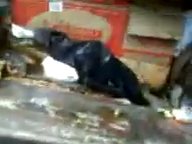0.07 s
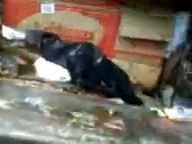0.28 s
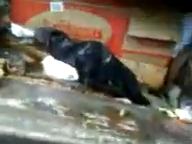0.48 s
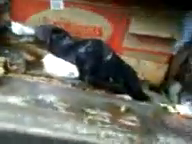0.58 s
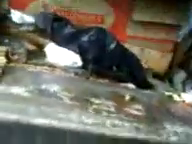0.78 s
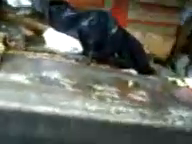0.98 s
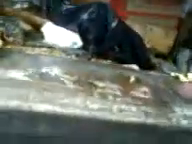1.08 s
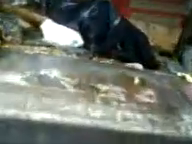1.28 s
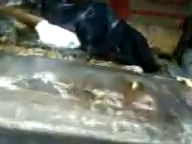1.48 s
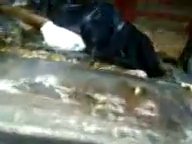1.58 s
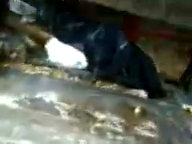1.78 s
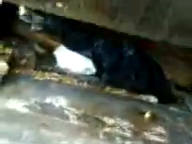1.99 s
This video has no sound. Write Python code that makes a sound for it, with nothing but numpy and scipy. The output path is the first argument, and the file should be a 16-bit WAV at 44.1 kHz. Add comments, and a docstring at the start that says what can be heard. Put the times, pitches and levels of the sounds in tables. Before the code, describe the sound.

A loud, slightly distorted bang comes as a squeezed, hissing bag bursts inside a garbage truck. The steel rings briefly, then rubbish slides and crackles while the machinery keeps running, heard through a muffled microphone.

```python
"""A refuse truck's packer blade squeezes a plastic bag in the steel hopper, over engine and hydraulics.
First the stretched bag hisses, whistles and snaps, and a pinhole squeals. At about 0.24 s the film rips:
torn edges squeak, puffs of air thump the cavity, and the bang overloads a small narrow-band recorder.
The bang rebounds and the steel panels ring down. From 0.5 s the rubbish slides and knocks as it settles,
then it scrapes along the steel while the crackle and the din of the machinery go on."""
import sys
import numpy as np
from scipy import signal
from scipy.fft import rfft, irfft
from scipy.io import wavfile

SR = 44100
rng = np.random.default_rng(int(sys.argv[2]) if len(sys.argv) > 2 else 0)


def pcm_store(signal):
    """Save signal as 16-bit PCM."""
    levels = np.round(np.clip(np.atleast_2d(signal), -1, 1) * 32767)
    wavfile.write(sys.argv[1], SR, levels.astype(np.int16).T)


N = 88200
TIME = np.arange(N) / SR
RISE_S = 0.0024  # onset of the bang and of each tone burst


# rips of the film: start_s, level_db, resonance_hz, width_hz, t60_s
FILM_RIPS = [(0.2392, -20, 1380, 1790, 0.18), (0.244, -12, 2600, 900, 0.037), (.2515, -11, 2700, 894, 0.12),
             (0.2598, -8.5, 2020, 1378, 0.082), (0.276, -11.5, 950, 700, .05), (0.305, -20, 1300, 920, .08),
             (0.3165, -17, 2100, 900, .08)]

def rips():
    """Fracture: the film fails in quick steps, each a decaying burst of resonant noise."""
    return dull(sum(from_db(db) * fade(start, t60) * rms_one(resonance(noise(), hz, width))
                    for start, db, hz, width, t60 in FILM_RIPS))


# puffs of air: start_s, level_db, pitch_hz, t60_s
AIR_PUFFS = [(.2415, -6.5, 514, 0.034), (.2655, -2.5, 480.6, .06), (.293, -15, 492, 0.032)]

def puffs():
    """Cavity resonance: escaping air thumps the hollow of the hopper."""
    return tone_bursts(AIR_PUFFS, wander=0.042)


# squeaks of torn edges: start_s, level_db, pitch_hz, t60_s
EDGE_SQUEAKS = [(.2512, -8.5, 2860, .09), (.318, -13.5, 2070, .11)]

def squeaks():
    """Flow-induced vibration: torn edges sound briefly in the escaping air."""
    return tone_bursts(EDGE_SQUEAKS, wander=0.011)


# spectrum of the bang: frequency_hz, relative_db
BANG_SPECTRUM = [(30, -30), (70, -23), (150, -19), (320, -18), (500, -3), (640, -5.5), (950, -7),
                 (1350, -8), (1780, -11.5), (2050, -5), (2400, -3.5), (2650, -10.5), (3100, -8),
                 (3600, -26.5), (4000, -32.5), (4500, -54.5)]
# reverberation time of the hopper: frequency_hz, t60_s
BANG_DECAY = [(100, 0.61), (500, 0.61), (1200, 0.72), (2200, 0.6), (3600, .42)]
# the bang and its rebound: start_s, peak_s, peak_db, t60_factor
BANG_SWELLS = [(.238, 0.272, -11.5, .42), (.29, 0.322, -18, 1.013)]

def bang(rise_db=7, flutter_db=1.0):
    """Reverberation: sound builds between the steel walls, rebounds and dies away band by band."""
    parts = bands(coloured(noise(), BANG_SPECTRUM))
    wash = 0
    for start, peak, db, t60_factor in BANG_SWELLS:
        build = ramp(TIME - start, RISE_S) * level([(start, db - rise_db), (peak, db)])
        age = np.maximum(TIME - peak, 0)
        for hz, band in parts:
            decay = from_db(-60 * age / (t60_factor * at_hz(BANG_DECAY, hz)))
            wash = wash + build * decay * np.roll(band, int(start * SR))  # shift decorrelates the swells
    return wash * from_db(flutter_db * drift(60))


# modes of the steel hopper: pitch_hz, peak_db
PANEL_MODES = [(474, -23.5), (525, -23.5), (712, -30.5), (839, -29.5), (915, -20), (1130, -25.5),
               (1318, -18), (1550, -23), (1890, -25.5), (2082, -25.5), (2260, -13.5), (2395, -28.5),
               (2607, -24), (2860, -31)]

def panels(t60_s=.33):
    """Modal vibration: the bang drives the steel panels, which ring at their natural frequencies."""
    drive = noise() * fade(start=.25, t60=0.22)
    return sum(from_db(db) * peak_one(ring(drive, hz, t60_s)) for hz, db in PANEL_MODES)


def squeal(start_s=.212, peak_s=.238, end_s=.249, pitch_hz=2077, hum_hz=530):
    """Self-excited oscillation: a pinhole squeals and the cavity hums, swelling until the film fails."""
    swell = level([(start_s, -21.5), (peak_s, -10)])
    gate = ramp(TIME - start_s, .001) * ramp(end_s - TIME, 0.0044)
    roughness = 1 + 0.079 * drift(249)
    hum = from_db(-20.5) * np.sin(2 * np.pi * hum_hz * TIME)
    return swell * gate * roughness * (np.sin(2 * np.pi * pitch_hz * TIME) + hum)


# envelope of the leak: time_s, level_db
HISS_LEVEL = [(0, -47.5), (.09, -53), (.135, -35.5), (.17, -31), (.205, -34), (.24, -24), (.27, -81)]
# spectrum of the leak: frequency_hz, relative_db
HISS_SPECTRUM = [(300, -27), (1300, -12.5), (2200, -3), (2600, -4.5), (3050, -7), (3450, -11.5),
                 (3700, -19.5), (4400, -41)]

def hiss():
    """Turbulence: air leaking from the stretched bag makes broadband noise."""
    return level(HISS_LEVEL) * coloured(noise(), HISS_SPECTRUM)


# envelope of the whistle: time_s, level_db
WHISTLE_LEVEL = [(0, -50), (.1, -61), (.13, -37), (.175, -38), (.205, -51), (.24, -49), (.27, -81.5)]

def whistle():
    """Sharp resonance: a narrow band of the leak's noise is heard as a thin pitch."""
    return level(WHISTLE_LEVEL) * narrow_noise(hz=3488, width_hz=120)


def snap(start_s=.1699, peak_db=-11.5):
    """Impulse response: the stretching plastic gives one heavily damped click."""
    click = signal.unit_impulse(N, int(start_s * SR)) + 1e-18
    return from_db(peak_db) * peak_one(dull(resonance(click, hz=2050, width_hz=520)))


# envelope of the slide: time_s, level_db
SLIDE_LEVEL = [(.4, -57), (.5, -47), (.555, -32.5), (.61, -35.5), (.66, -53), (.8, -54)]
# spectrum of the slide: frequency_hz, relative_db
SLIDE_SPECTRUM = [(80, -13.5), (300, -18), (450, 3), (900, 2.5), (1700, -0.5), (2400, 3), (3050, 0.5),
                  (3400, -19.5), (4300, -36.5)]

def slide():
    """Sliding friction: rubbish slips into the gap with a grainy rush."""
    return level(SLIDE_LEVEL) * coloured(noise() + .5 * rms_one(grains()), SLIDE_SPECTRUM)


# knocks of rubbish: start_s, level_db, pitch_hz, t60_s
SOFT_KNOCKS = [(.53, -30.5, 431.5, 0.065), (.597, -31, 520, .1), (.69, -31, 519, 0.11),
               (.695, -47, 105, 0.1)]

def knocks():
    """Damped vibration: each soft impact of settling rubbish leaves a short low tone."""
    return tone_bursts(SOFT_KNOCKS, wander=0.042)


# scrapes of rubbish: peak_s, length_s, level_db, resonance_hz
STEEL_SCRAPES = [(0.908, 0.074, -40, 2260), (1.25, .1, -40, 1350), (1.278, 0.065, -39, 2145),
                 (1.423, .07, -41, 1090), (1.805, .1, -39.5, 1990), (1.934, .06, -40, 1330),
                 (1.944, 0.092, -40.5, 530)]

def scrapes():
    """Friction-driven resonance: rubbish rubs along the steel in bell-shaped swells."""
    out = 0
    for peak, length, db, hz in STEEL_SCRAPES:
        swell = np.exp(-2 * ((TIME - peak) / length) ** 2)
        out = out + from_db(db) * swell * narrow_noise(hz, width_hz=280)
    return dull(out)


# envelope of the din: time_s, relative_db
DIN_ENVELOPE = [(0, -36), (.09, -37.5), (.3, -41), (.7, -38), (.8, -38.5), (1.08, -37), (1.27, -38),
                (1.55, -37.5), (1.75, -37), (2, -37.5)]
# spectrum of the din and the crackle: frequency_hz, relative_db
DIN_SPECTRUM = [(18, -58.5), (30, -31.5), (130, -18), (190, -18.5), (265, -15), (341, -13.5), (371, -16),
                (395, -5.5), (430, -8.5), (530, -1), (577, -4), (654, -2), (757, -7.5), (1390, -2.5),
                (1580, -5), (2070, -1.5), (2500, -3.5), (2780, -9.5), (3290, -13), (4050, -37),
                (4500, -49.5), (5850, -82.5), (9900, -120)]

def din(gain_db=0.5, flicker_db=1.18):
    """Broadband machine noise: engine and hydraulics rush, each band wavering independently."""
    rush = sum(band * from_db(flicker_db * drift(7)) * bass_gain(hz)
               for hz, band in bands(coloured(noise(), DIN_SPECTRUM)))
    return from_db(gain_db) * level(DIN_ENVELOPE) * rms_one(rush)


def crackle(level_db=-44.5):
    """Shot noise: rubbish under the blade gives way in many tiny cracks."""
    return from_db(level_db) * coloured(grains(), DIN_SPECTRUM)


# tones of engine and pump: pitch_hz, relative_db
MACHINE_TONES = [(403.7, -54.5), (538.3, -53), (646.0, -61), (1389, -50.5), (2132, -49), (2466, -54)]

def whine(gain_db=-3, wander=0.00397):
    """Periodic motion: engine and pump give off slightly wavering tones."""
    return sum(from_db(db + gain_db) * np.sqrt(2) * wavering_sine(hz, wander, rate_hz=8) * bass_gain(hz)
               for hz, db in MACHINE_TONES)


# the machinery's bass against its treble: time_s, relative_db
BASS_BALANCE = [(0, -0.5), (.17, -6.5), (.5, 2.5), (1, -0.5), (1.45, 2), (1.93, -1.5)]

def bass_gain(hz, edge_hz=700):
    """Amplitude modulation: the machinery's low frequencies slowly sink and swell."""
    return level(BASS_BALANCE) if hz < edge_hz else 1


def from_db(db):
    """Decibels to amplitude ratio."""
    return 10 ** (np.asarray(db) / 20)


def rms_one(x):
    """Normalisation to unit rms."""
    return x / np.sqrt(np.mean(x ** 2) + 1e-20)


def peak_one(x):
    """Normalisation to unit peak."""
    return x / np.abs(x).max()


def level(rows):
    """Amplitude envelope from rows of time_s, level_db."""
    return from_db(np.interp(TIME, *np.transpose(rows)))


def ramp(age, length_s):
    """Linear rise from 0 to 1."""
    return np.clip(age / length_s, 0, 1)


def fade(start, t60):
    """Exponential decay from 1, falling 60 dB in t60 seconds."""
    return (TIME >= start) * from_db(-60 * np.maximum(TIME - start, 0) / t60)


def at_hz(points, hz):
    """Interpolation on a log-frequency axis."""
    f, value = np.transpose(points)
    return np.interp(np.log(np.maximum(hz, 1)), np.log(f), value)


def coloured(x, spectrum):
    """Spectral shaping, at unit rms."""
    return rms_one(irfft(rfft(x) * from_db(at_hz(spectrum, np.fft.rfftfreq(N, 1 / SR))), N))


def noise():
    """White noise."""
    return rng.standard_normal(N)


def grains(per_s=180, spread_db=0.5):
    """Poisson process: random clicks of uneven size."""
    sizes = from_db(spread_db * np.minimum(rng.exponential(1, N), 3)) * rng.choice([-1, 1], N)
    return sizes * (rng.random(N) < per_s / SR)


def drift(rate_hz):
    """Low-pass noise: a random wander of unit rms."""
    return rms_one(irfft(rfft(noise()) / (1 + (np.fft.rfftfreq(N, 1 / SR) / rate_hz) ** 2), N))


def bands(x):
    """Filter bank: (centre_hz, signal) pairs, half an octave apart, that sum to the whole."""
    centres = 60 * 2 ** np.arange(0, 6.6, .5)
    hz, whole = np.fft.rfftfreq(N, 1 / SR), rfft(x)
    return [(c, irfft(whole * np.interp(hz, centres, centres == c), N)) for c in centres]


def resonance(x, hz, width_hz):
    """Two-pole band-pass."""
    r = np.exp(-np.pi * width_hz / SR)
    return signal.lfilter([1, 0, -1], [1, -2 * r * np.cos(2 * np.pi * hz / SR), r * r], x)


def narrow_noise(hz, width_hz):
    """Noise through two like resonances in series, at unit rms."""
    return rms_one(resonance(resonance(noise(), hz, width_hz), hz, width_hz))


def ring(x, hz, t60):
    """Damped harmonic oscillator driven by x."""
    r, w = from_db(-60 / (t60 * SR)), 2 * np.pi * hz / SR
    return signal.lfilter([0, np.sin(w)], [1, -2 * r * np.cos(w), r * r], x + 1e-18)


def dull(x, top_hz=3280):
    """Low-pass: the treble above top_hz falls away steeply."""
    return signal.sosfilt(signal.butter(8, top_hz, fs=SR, output="sos"), x)


def wavering_sine(hz, wander, rate_hz):
    """Random frequency modulation; wander is the rms fraction of the pitch."""
    return np.sin(2 * np.pi * np.cumsum(hz * (1 + wander * drift(rate_hz))) / SR)


def tone_bursts(rows, wander):
    """Damped sinusoids with a quick rise and an unsteady pitch."""
    out = 0
    for start, db, hz, t60 in rows:
        rise = np.sin(np.pi / 2 * ramp(TIME - start, RISE_S)) ** 2
        out = out + from_db(db) * rise * fade(start, t60) * wavering_sine(hz, wander, rate_hz=150)
    return out


def scene():
    """Superposition: all sources add at the mouth of the hopper, in mono."""
    machinery = din() + whine()
    rubbish = slide() + scrapes() + crackle() + knocks()
    bag = snap() + squeal() + whistle() + hiss() + rips() + squeaks() + puffs()
    hopper = bang() + panels()
    return (bag + hopper + rubbish + machinery)[None]


def record(dry, band_edge_hz=4260, overload=.71, rumble_hz=45, top_hz=15400):
    """Band limiting and clipping: a narrow-band recorder overloads on the bang, then trims both ends."""
    narrow = signal.sosfilt(signal.butter(16, band_edge_hz, fs=SR, output="sos"), dry)
    clipped = np.clip(narrow, -overload, overload)
    no_rumble = signal.sosfilt(signal.butter(1, rumble_hz, "high", fs=SR, output="sos"), clipped)
    return signal.sosfilt(signal.cheby1(14, .1, top_hz, fs=SR, output="sos"), no_rumble)


dry = scene()
out = record(dry)
pcm_store(out)
```